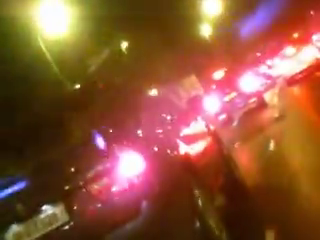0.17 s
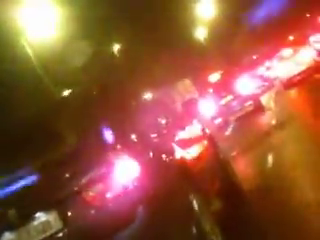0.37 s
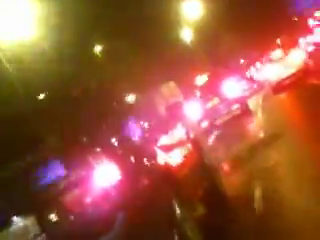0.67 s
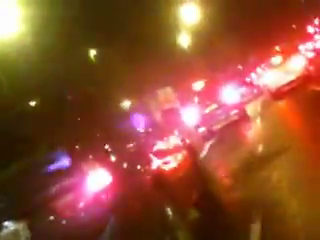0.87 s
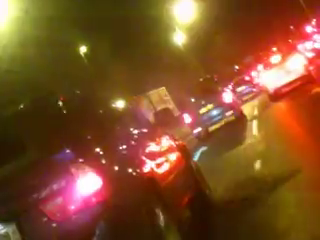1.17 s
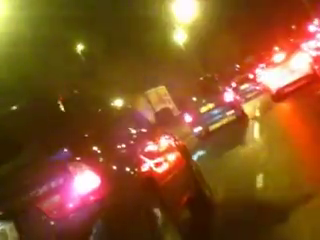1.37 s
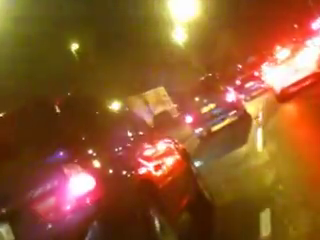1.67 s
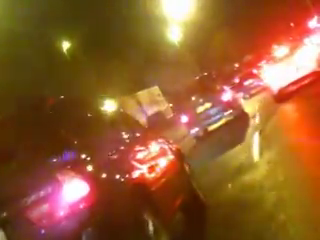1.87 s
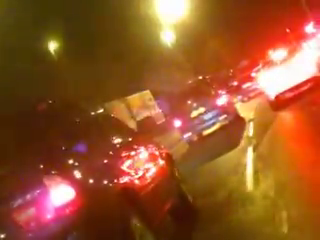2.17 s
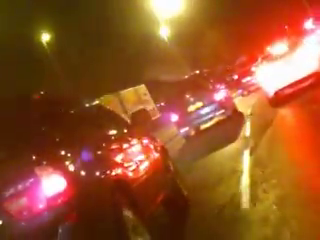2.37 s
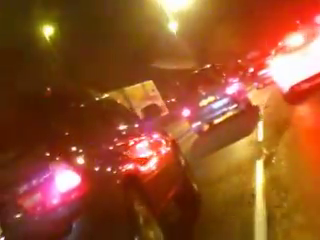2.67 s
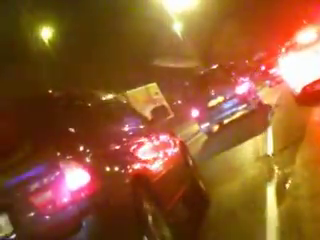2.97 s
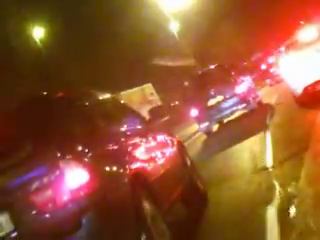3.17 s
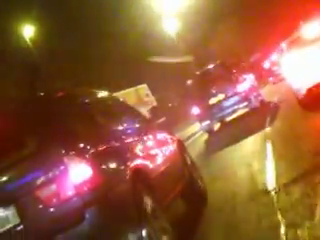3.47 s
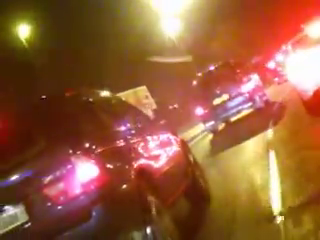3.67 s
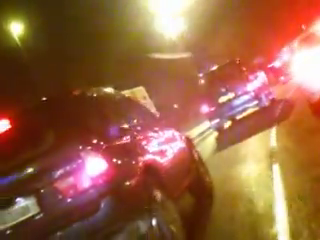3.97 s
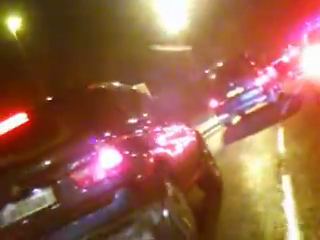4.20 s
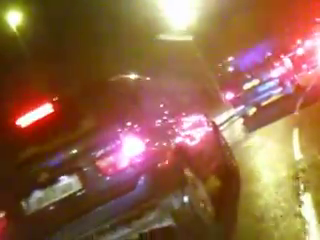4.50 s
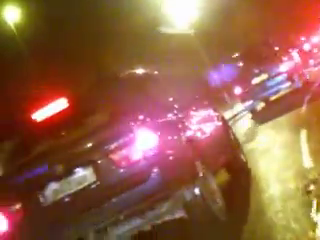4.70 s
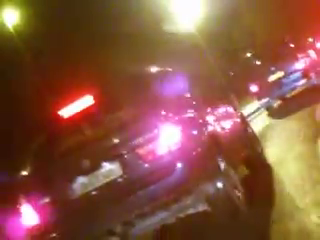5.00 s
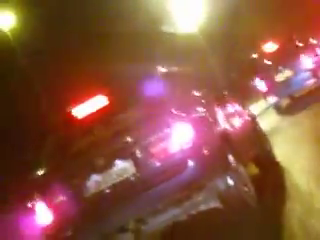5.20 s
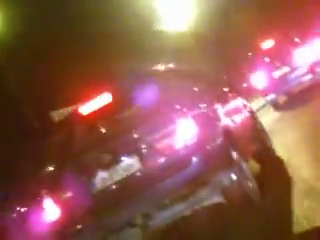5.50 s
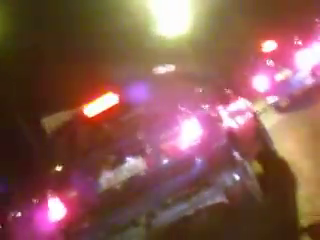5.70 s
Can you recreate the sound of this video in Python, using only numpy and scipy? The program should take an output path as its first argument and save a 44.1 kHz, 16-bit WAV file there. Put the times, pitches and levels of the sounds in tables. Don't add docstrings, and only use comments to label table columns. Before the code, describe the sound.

Motorcycle engine drones boxily in slow night traffic while wind slams the microphone in harsh clipped bursts, then idles quietly before the blasts return.

```python
import sys
import numpy as np
from scipy import signal
from scipy.io import wavfile
from scipy.ndimage import uniform_filter1d

SR = 44100
rng = np.random.default_rng(int(sys.argv[2]) if len(sys.argv) > 2 else 0)


def dump(signal):
    limited = np.clip(np.atleast_2d(signal).T, -1, 1)
    pcm = np.round(limited * 32767).astype(np.int16)
    wavfile.write(sys.argv[1], SR, pcm)


def to_linear_factor(level_db):
    exponent = np.asarray(level_db, float) / 20
    return 10 ** exponent


N = 257984

# centre [Hz], width [Hz], level [dB].
HOUSING_MODES = [(945, 220, -17), (1206, 106, -5.5), (1528, 160, -1), (1707.4, 101.4, 3), (2019, 149, -7),
                 (2265, 69, -24), (2634, 14, -18.5), (3060, 230, -21.5), (3473, 610, -36)]
# start [s], length [s], turbulence at the start [dB], at the end [dB],
# eddy pressure [1 = full scale].
GUST_ROWS = [(.0, .3, -45, -45, 0.012), (0.444, 0.16, -8, -5.5, 3), (0.626, 0.12, -33, -9.5, 1.4),
             (.808, 0.011, -27.5, -28.5, 0.8), (1.039, 0.56, -27.5, -32, .92),
             (4.091, .276, -46.5, -49, 0.25), (4.38, 0.0091, -26, -30, 1.3), (4.728, 0.01, -26, -22, 0.98),
             (4.751, .065, -45.5, -28, 0.43), (4.828, .21, -25.5, -27.5, 0.73),
             (5.051, .39, -8, -10.5, 2.9), (5.446, 0.14, -25.5, -32.5, 0.82), (5.59, .26, -10.5, -13, 2.4)]
GUST_ATTACK_S = 0.037


def noise():
    return rng.standard_normal(N)


def band(x, hz, width_hz):
    return signal.lfilter(*signal.iirpeak(hz, hz / width_hz, fs=SR), x)


def ring(x, modes):
    y = 0
    for k, (hz, width_hz, db) in enumerate(modes):
        wide = 1.44 * width_hz
        y = y + (-1) ** k * to_linear_factor(db) * band(band(x, hz, wide), hz, wide)
    return y / np.std(y)


def walk(rate_hz):
    hold = int(SR / rate_hz)
    steps = np.repeat(rng.standard_normal(N // hold + 1), hold)
    y = uniform_filter1d(uniform_filter1d(steps, hold), hold)[:N]
    return y / np.std(y)


def engine():
    # centre [Hz], width [Hz], level [dB].
    frame_modes = [(29.2, 19, -5), (83, 4.3, -2.5), (178.7, 58.7, -1.5), (211.5, 53.6, 2),
                   (332.6, 36, -1.5), (417.3, 51, -12.5)]
    # time [s], load [0-1].
    load_points = [
        (0, 1),
        (.45, 1),
        (.9, 0.4),
        (2.4, .05),
        (4.1, 0),
        (4.5, 0.4),
        (4.9, 0),
        (5.85, 0.8),
    ]
    firing_hz, jitter = 22.82, 0.064
    firings = np.cumsum(firing_hz * (1 + jitter * walk(5.945))) / SR
    throb_db = 1.3 * np.cos(2 * np.pi * firings) + 0.91 * np.cos(np.pi * firings)
    rush = ring(to_linear_factor(throb_db + 1.33 * walk(40)) * noise(), HOUSING_MODES)
    drone = ring(to_linear_factor(throb_db + 0.66 * walk(16)) * noise(), frame_modes)
    hum = ring(to_linear_factor(2.3 * throb_db) * noise(), [(156.5, 7.1, 0)])
    street = to_linear_factor(-13.5) * band(noise(), 700, 4400) + to_linear_factor(-19.0) * noise()

    seconds, loads = np.array(load_points).T
    load = np.interp(np.arange(N) / SR, seconds, loads)
    rush_db = -27.5 + 2 * load
    hum_db = -21 + 13 * load
    return to_linear_factor(rush_db) * (rush + street + to_linear_factor(-4.5) * drone + to_linear_factor(hum_db) * hum)


def wind_db():
    calm_db, release_s = -53, 0.0073
    t = np.arange(N) / SR
    levels = []
    for start, span, db0, db1, _ in GUST_ROWS:
        corners = [start - GUST_ATTACK_S, start, start + span, start + span + release_s]
        levels.append(np.interp(t, corners, [calm_db, db0, db1, calm_db]))
    return np.max(levels, axis=0)


def gusts():
    wind = wind_db()
    low = ring(noise(), [(32.4, 40.3, -0.5), (78, 84.6, -0.5)])
    howl = ring(noise(), [(980, 200, -8), (1530, 650, -6.0), (1700, 310, 2.5)])
    howl_db = np.minimum(wind - 14.5 + 11.0 * walk(70), -18)
    swirl_db = -3 + 6.5 * np.minimum(walk(45), 1.2)
    low = low + to_linear_factor(swirl_db) * ring(noise(), [(212, 186, 2.5), (478, 343, -7.5)])
    crests = low * (0.16 + 0.44 * np.abs(low))
    return to_linear_factor(wind + 1.5) * crests + to_linear_factor(howl_db) * howl


def whistles():
    # start [s], peak [dB], pitch [Hz], length [ms].
    whistle_rows = [(0.427, -18.5, 1770, 5.8), (1.0286, -10.5, 1731, 7.4), (1.166, -23.5, 1666, 5.6),
                    (1.268, -34, 1700, 7), (1.346, -23, 1535, 2), (1.4905, -20.5, 1700, 3),
                    (1.494, -10, 1704, 10.5), (1.504, -15.5, 1794, 27), (2.6876, -16, 1510, 8.7),
                    (2.6997, -23.5, 1576, 7.5), (2.703, -14.5, 1724, 18), (3.6616, -15.5, 1670, 12),
                    (3.7466, -20, 1743, 33), (4.0469, -18.5, 1637, 7.5), (4.3298, -19, 1585, 13),
                    (4.4137, -12.5, 1630, 1.7), (4.429, -17, 1553, 5.1), (4.499, -16.5, 1650, 6.5),
                    (4.514, -15.5, 1660, 8), (4.5373, -19.5, 1680, 6.3), (4.5658, -19.5, 1670, 10),
                    (4.577, -13.5, 1700, 8.1), (4.708, -6.5, 1699, 10), (4.7245, -10.5, 1686, 9.9),
                    (4.8942, -21, 1670, 14)]
    out, t = np.zeros(N), np.arange(N) / SR
    air = ring(noise(), HOUSING_MODES)
    for start, db, hz, ms in whistle_rows:
        i = slice(int(start * SR), int((start + .12) * SR))
        age = (t[i] - start) / (ms / 1000)
        swell = np.tanh(40.0 * age) * np.exp(-age ** 2)
        out[i] += to_linear_factor(db) * swell * (np.sin(2 * np.pi * hz * t[i]) + .5 * air[i])
    return out


def eddies():
    # centre [s], length [ms].
    pull_rows = [(.449, 7), (.468, 6.8), (.482, 6.2), (.526, 12), (.541, 7.1), (.563, 10), (.633, 14.8),
                 (.673, 11), (.705, 7.7), (1.19, 9), (1.303, 5.8), (1.384, 8.1), (1.463, 6.1), (1.539, 5.1),
                 (4.847, 10), (4.964, 8.1), (5.049, 9), (5.061, 9.8), (5.083, 7.7), (5.177, 8), (5.213, 11),
                 (5.254, 7), (5.296, 9.8), (5.337, 10.7), (5.351, 6.4), (5.392, 6.5), (5.631, 6.5),
                 (5.67, 12.9), (5.712, 6.8), (5.753, 6.4)]
    # centre [s], pressure [1 = full scale], length [ms].
    push_rows = [(.459, 1, 8), (.506, 2.5, 9), (.55, 1.6, 11), (.645, 2.5, 9.1), (.686, 1.1, 15),
                 (.736, 2.5, 4), (1.204, 1.2, 4.3), (1.319, 1, 6.8), (1.446, 1.2, 4.5), (4.822, 1, 3.8),
                 (4.863, 1.1, 10), (5.203, 2.5, 6.6), (5.36, 2.5, 10.3), (5.383, 1.3, 10.1),
                 (5.403, 1.5, 8), (5.444, 2.5, 5.3), (5.517, 1.2, 6), (5.6, 1.6, 7.4), (5.657, 1.4, 9),
                 (5.684, 1, 11), (5.722, 1, 12.6), (5.782, 2.5, 5.8), (5.819, 1.8, 8), (5.839, 2.5, 5.4)]
    shed_hz, jitter_s, spread = 49.3, .0015, .28
    gust_table = np.array(GUST_ROWS)
    starts, sizes = gust_table[:, 0] - GUST_ATTACK_S, gust_table[:, 4]
    held = []
    for centre, ms in pull_rows:
        size = max(sizes[np.searchsorted(starts, centre) - 1], 1.2)
        held.append((centre, -size, ms))
    held = np.array(held + list(push_rows))

    shed = []
    for start, span, _, _, size in GUST_ROWS:
        for k, (late, pull, push, lag, long) in enumerate(rng.standard_normal((30, 5))):
            s = start + k / shed_hz + late * jitter_s * (k > 0)
            beat = size * (1 if k % 2 else .5)
            suction = (s, -beat * np.exp(spread * pull))
            answer = (s + .0034 * np.exp(.5 * lag), .75 * beat * np.exp(spread * push))
            rebound = (s + .0095 * np.exp(.25 * push), -.7 * size * (size > 1.5))
            for at, pressure in (suction, answer, rebound):
                pressure = np.clip(pressure, -4.2, 4.2)
                ms = (0.61 + 1.9 * min(abs(pressure), 1.5)) * np.exp(.25 * long)
                is_free = np.all(np.abs(held[:, 0] - at) * 2000 > held[:, 2] + ms / 2)
                if pressure and at < start + span and is_free:
                    shed.append((at, pressure, ms))
    return held, np.array(shed)


def slams(rows):
    out = np.zeros(N)
    offset = np.arange(-1000, 1000)
    ms_off = offset / SR * 1000
    uneven = np.exp(.65 * rng.standard_normal((400, 3)))
    for (s, size, ms), (rise, fall, depth) in zip(rows, uneven):
        if abs(size) < 1:
            shape = 1.3 * np.exp(-np.abs(ms_off / (.45 * ms)) ** 1.5)
        else:
            soft_ms = .22 * min(ms, 6) / size ** 2
            onset = np.tanh((ms_off + ms / 2) / (soft_ms * rise))
            release = np.tanh((ms_off - ms / 2) / (soft_ms * fall))
            reach = .46 if size > 0 else .85
            shape = (onset - release) / 2 * reach * np.clip(depth ** .4, .75, 1.5)
        i = int(s * SR) + offset
        inside = (i >= 0) & (i < N)
        out[i[inside]] += size * shape[inside]
    return out


def chatter(rows):
    out, t = np.zeros(N), np.arange(N) / SR
    flap = ring(noise(), [(585, 510, -1.5), (1030, 260, -9.5)])
    spit = ring(noise(), [(1700, 720, 3.0), (3493, 610, -11)])
    for s, db, ms in rows:
        i = slice(int(s * SR), int((s + .03) * SR))
        over_db = max(0, db + 18.0)
        fade = np.exp(-((t[i] - s) / (ms / 1000)) ** 2)
        swing = fade * (spit[i] + min(over_db / 5, 1) * flap[i])
        even_out = np.sqrt(np.sum(fade ** 2) / np.sum(swing ** 2))
        out[i] += to_linear_factor(db + 0.5 + 0.85 * over_db) * swing * even_out
    return out


def scene():
    # start [s], peak [dB], length [ms].
    chatter_rows = [(.4653, -4, 6.5), (.4927, -3.5, 2.8), (5.4708, -7.5, 1.2), (.5826, -6.5, 3),
                    (.6493, -9, 1.54), (4.8622, -11, 2.8), (.7243, -9.5, 3.4), (1.057, -15, 2.9),
                    (1.2044, -8.5, 1.4), (1.2477, -5, 0.63), (1.279, -11, 1.6), (1.3204, -8, 1.4),
                    (1.362, -11.5, 1.4), (1.405, -14, 2.9), (1.5358, -12.5, 2.7), (1.5587, 4, 0.89),
                    (4.7091, -12, 1.66), (5.5201, -13.5, 1.9), (4.9431, -10, 1), (5.0698, 4, 1.2),
                    (5.1889, -8, 2.5), (5.2299, -1.5, 1.8), (5.2664, -2, 3.8), (5.3035, -7.5, 10),
                    (5.3933, 3.5, 1), (5.6031, -6, 2.6), (5.6418, -8.5, 1.1), (5.689, -9.5, 8.6),
                    (5.7465, -6, 2.6), (5.7697, -7.5, 4)]
    steady = engine() + gusts() + whistles()
    held, shed = eddies()
    tears = [(s + ms / 2000, -22.5 + 20 * np.log10(-p), 1.8) for s, p, ms in shed if p < 0]
    slammed = slams(np.vstack([held, shed]))
    return (steady + slammed + chatter(list(chatter_rows) + tears))[None]


def low_pass(x):
    return signal.sosfilt(signal.butter(12, 16500, fs=SR, output="sos"), x)


def record(dry):
    bent = dry - 0.29 * dry ** 2 * (np.abs(dry) < 1)
    railed = np.clip(bent, -.775, .41)
    railed = railed + to_linear_factor(-54) * noise()
    creep = 0
    for tau_s, share, start in [(.07, 0.31, -0.14), (.45, 0.23, -0.25)]:
        stay = np.exp(-1 / (tau_s * SR))
        creep = creep + share * signal.lfilter([1 - stay], [1, -stay], railed, zi=[[start]])[0]
    taps = signal.firwin(numtaps=141, cutoff=4200, window=("kaiser", 4.5), fs=SR)
    narrow = signal.filtfilt(taps, 1, railed - creep + .004, padlen=999)
    finished = np.clip(narrow, -.707, .707)
    return low_pass(finished)


dry = scene()
out = record(dry)
dump(out)
```